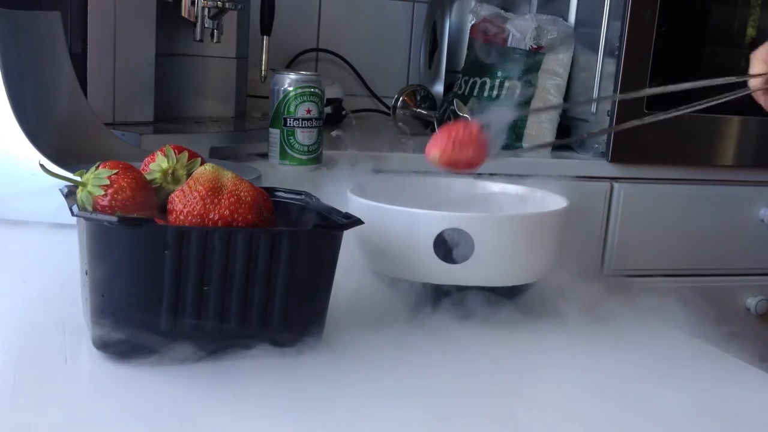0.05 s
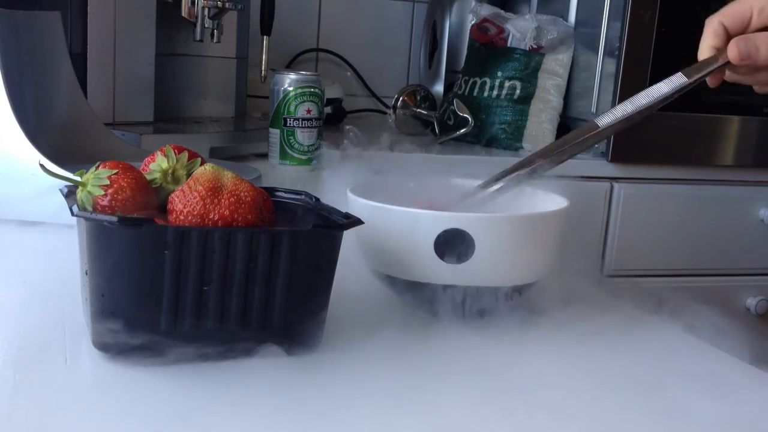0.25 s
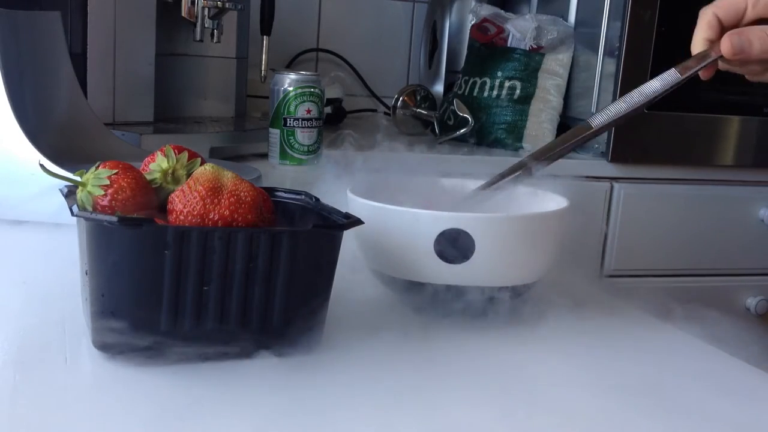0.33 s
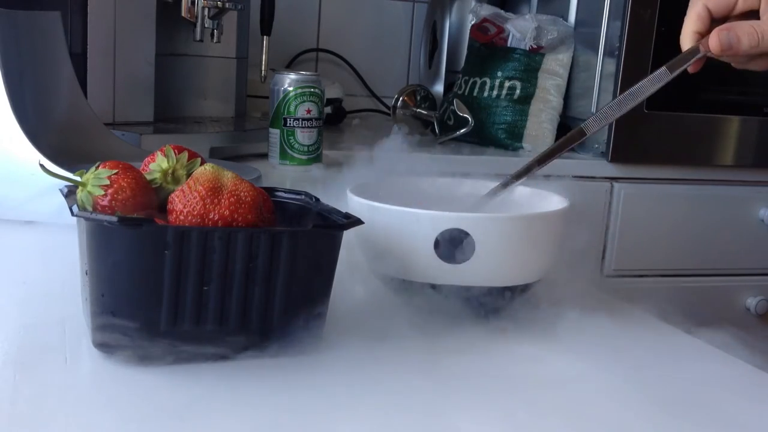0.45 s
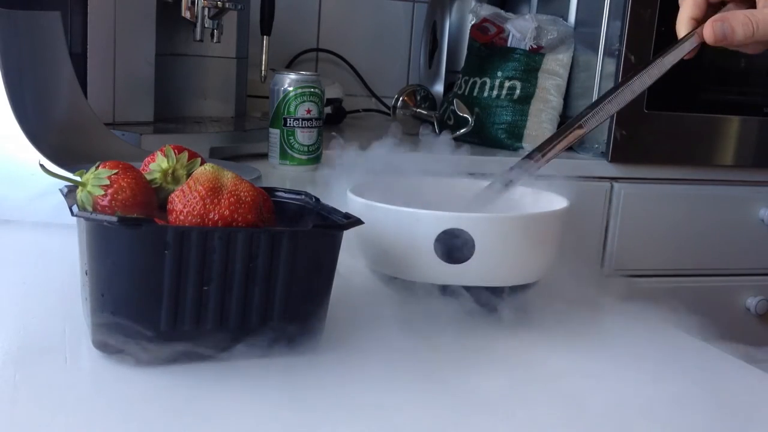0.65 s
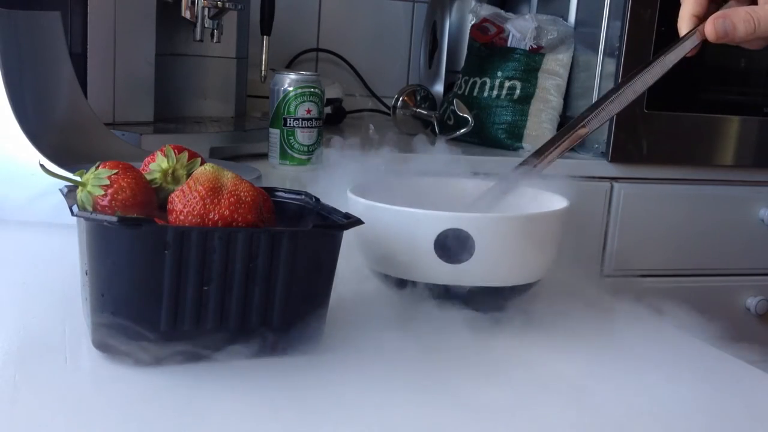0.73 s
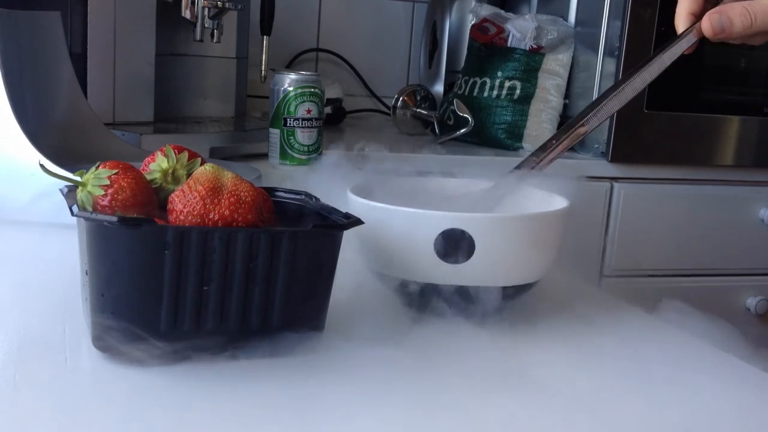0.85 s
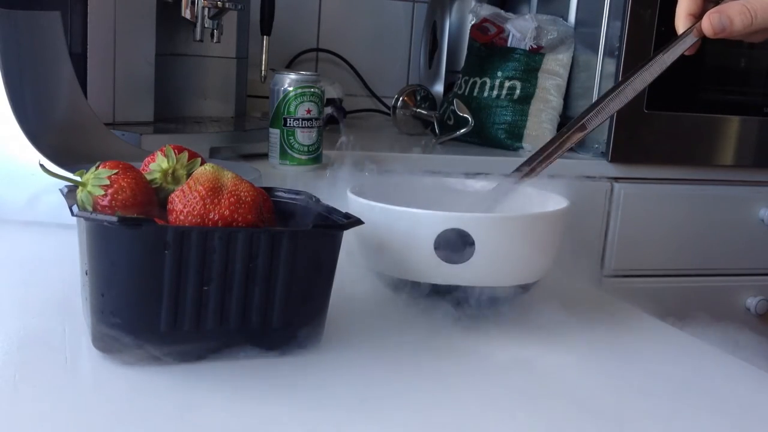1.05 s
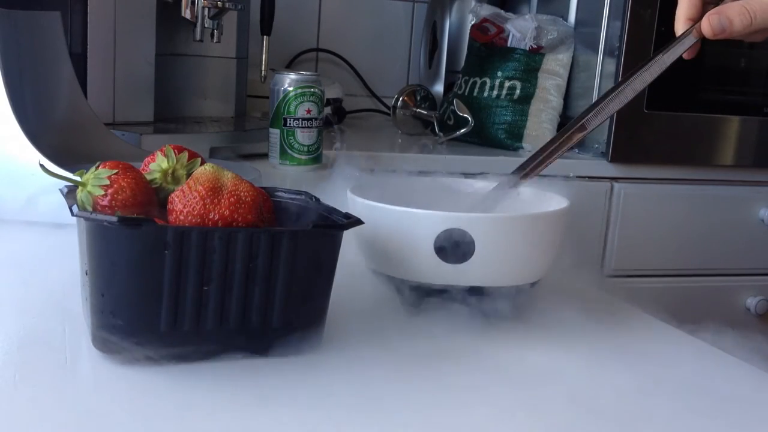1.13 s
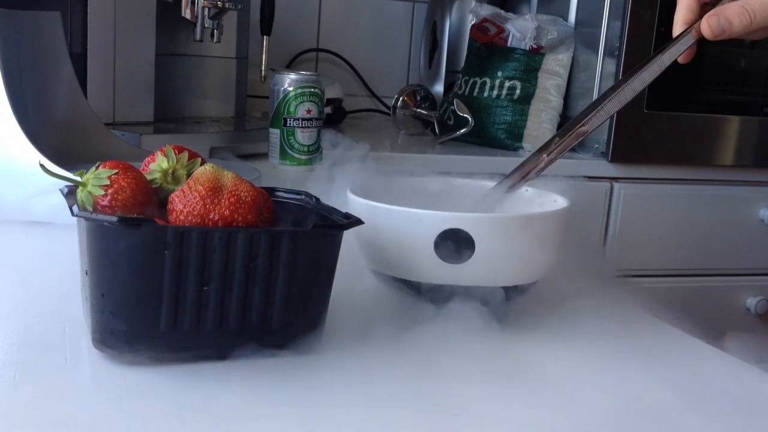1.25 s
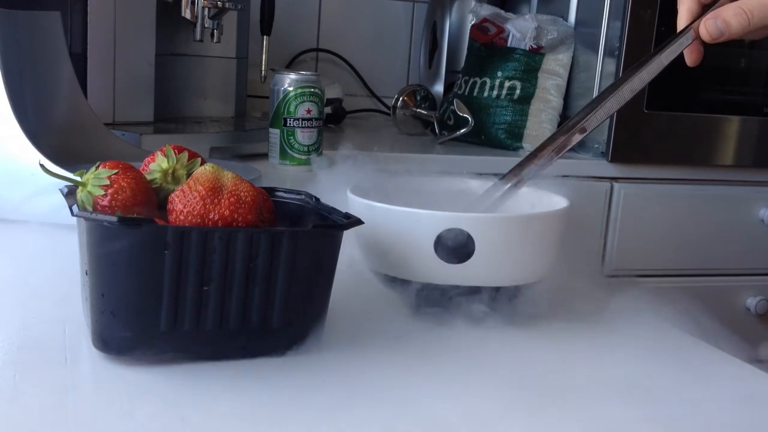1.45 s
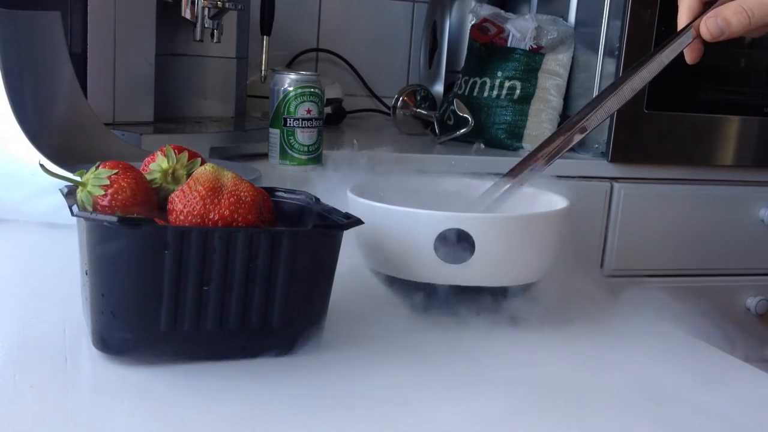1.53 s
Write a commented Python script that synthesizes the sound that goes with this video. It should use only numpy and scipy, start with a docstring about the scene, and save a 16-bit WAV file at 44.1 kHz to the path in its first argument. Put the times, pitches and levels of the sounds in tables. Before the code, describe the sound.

Metal tongs clink on a bowl as a strawberry thuds in, then a faint fizz.

```python
"""Strawberry into a freezing bowl

Steel tongs lower a strawberry into very cold liquid in a bowl on a kitchen counter. They clink on the
bowl three times, ever more lightly, both arms ringing; the berry lands with a thud and bumps once more.
Vapour boils off in a soft fizz with a few larger bubbles, and the fruit ticks as it freezes.
Hits and bubbles echo in the kitchen, over a bed of room air and appliance hum."""
import sys
import numpy as np
from scipy import signal
from scipy.fft import rfft, irfft
from scipy.io import wavfile

SR = 44100
rng = np.random.default_rng(int(sys.argv[2]) if len(sys.argv) > 2 else 0)


def unload_audio(sound):
    """Save the sound as a 16-bit wav file, at the path given as the first command line argument."""
    columns = np.transpose(np.atleast_2d(sound))
    # keep every value between -1 and 1, then stretch to whole-number steps
    steps = np.round(np.clip(columns, -1, 1) * 32767)
    wavfile.write(sys.argv[1], SR, steps.astype(np.int16))


N = 70560
TIME = np.arange(N) / SR
SHARP_RISE_S, SOFT_RISE_S = 0.00022, 0.001

# Tone colour of the room air: f/Hz, relative level/dB
AIR_SPECTRUM = [(30, -23), (60, -29), (100, -8.5), (160, 0), (240, 0), (350, -3.5), (500, -9.5),
                (750, -7.5), (1400, -14), (2500, -16), (7500, -17.5), (15000, -21)]
# Partials of the appliance hum: f/Hz, relative level/dB
HUM_PARTIALS = [(193.8, -65.5), (242.2, -62), (296.1, -67.5), (344.5, -63), (436.0, -69.5), (689.1, -71),
                (1217, -74)]
# Tone colour of the boiling vapour: f/Hz, relative level/dB
VAPOUR_SPECTRUM = [(400, -15), (800, 6), (1400, 2), (2800, -3.5), (5000, -3.5), (7800, 2), (10000, -8.5),
                   (15000, -6)]
# Swell and ebb of the boil: t/s, level/dB
BOIL_CURVE = [(0, -80), (.25, -56), (.55, -59.5), (.85, -61), (1.1, -58.5), (1.25, -62.5), (1.38, -58),
              (1.6, -60.5)]
# Dry ticks of the freezing fruit: t/s, level/dB, centre f/Hz, t60/s
FREEZE_TICKS = [(0.0535, -34, 9900, 0.015), (0.6720, -45, 5500, 0.014), (0.8753, -42.5, 6000, .02),
                (1.1330, -50, 6000, .03), (1.3050, -48, 12000, .015), (1.543, -50, 7500, .015)]
# Tongs hit the bowl: t/s, first arm level/dB, second arm level/dB, ring tilt/(dB per octave),
# crack level/dB, knock level/dB
TONG_HITS = [(0.2366, -13, -10.5, 0, -17.5, -25), (0.3780, -19.5, -24, -3.5, -31, -36.5),
             (0.4848, -35, -46, 0.5, -37.5, -47.5)]
# Tone colour of the steel's contact crack: f/Hz, relative level/dB
CRACK_SPECTRUM = [(1500, -6), (2500, -12.5), (3500, 8), (5000, -8), (6200, -7), (9000, 5), (10500, -4),
                  (13000, -2.5), (15000, -6)]
# Modes of each arm of the tongs: f/Hz, relative flash level/dB, flash t60/s, relative tail level/dB
FIRST_ARM_MODES = [(3409, -10, 0.088, -24.5), (4270, -19, .04, -31), (5903, -5.5, 0.032, -24),
                   (5977, -1, 0.047, -37.5), (8910, -9.5, 0.045, -31), (9100, -14, 0.036, -29),
                   (13170, -20.5, .04, -36)]
SECOND_ARM_MODES = [(3351, -9, 0.042, -29), (4705, -15.5, 0.042, -29.5), (6150, 5, 0.017, -31),
                    (6684, -14.5, 0.052, -25.5), (8070, -16.5, 0.037, -26), (11810, -19.5, 0.047, -32),
                    (12440, -25, 0.061, -31)]
# Tone colour of the bowl knocking on the counter: f/Hz, relative level/dB
KNOCK_SPECTRUM = [(40, -35), (90, -12), (150, -20), (210, 0), (280, 0), (420, 3.5), (800, -13), (1400, -3),
                  (2200, -6), (4000, -58)]
# Low modes of bowl and counter: f/Hz, relative level/dB, t60/s
BOWL_COUNTER_MODES = [(151.2, -11.5, 0.27), (211, -1, 0.18), (312, -6, 0.06), (420, -7, 0.13),
                      (589.3, -9.5, 0.14), (649, -8.5, .1), (695.7, -14.5, 0.3), (961, -16.5, 0.2),
                      (1302, -9, 0.13), (1349, -12.5, 0.22), (1670, -10, 0.068), (1782, -18, 0.27)]
# The berry hits the bowl: t/s, slap level/dB, thud level/dB, low-pass f/Hz, thud t60/s, bowl level/dB
BERRY_HITS = [(0.2574, -5, -22.5, 2460, 0.057, -32.5), (0.2602, -10, -19.5, 1125, 0.1, -25.5),
              (0.2683, -21.5, -24.5, 1420, .07, -43), (0.5567, -40, -35.5, 651, 0.078, -37.5)]
# Tone colour of the berry's thud: f/Hz, relative level/dB
THUD_SPECTRUM = [(40, -42), (90, -33), (150, -3), (210, -18), (300, 3.5), (420, -6.5), (650, 1.5),
                 (1300, -7), (2500, -2), (6000, -44)]
# Tone colour of the kitchen reverb: f/Hz, level/dB
REVERB_SPECTRUM = [(100, -4.5), (300, -15.5), (1000, -9), (2500, -5.5), (6000, -12), (14000, -6.5)]
# Decay of the kitchen reverb: f/Hz, t60/s
REVERB_DECAY = [(100, 0.13), (500, 0.57), (2000, 0.43), (6000, 0.48), (14000, 0.3)]


def from_db(db):
    """Decibels to gain."""
    return 10 ** (np.asarray(db) / 20)


def unit_rms(x):
    """Scale to an rms of 1."""
    return x / np.sqrt(np.mean(x ** 2) + 1e-20)


def at_hz(points, hz):
    """Read a table on a log-frequency axis."""
    table_hz, values = np.transpose(points)
    return np.interp(np.log(np.maximum(hz, 1)), np.log(table_hz), values)


def colour(x, spectrum):
    """EQ a steady signal with a spectrum; rms 1."""
    hz = np.arange(N // 2 + 1) * SR / N
    return unit_rms(irfft(rfft(x) * from_db(at_hz(spectrum, hz)), N))


def noise(spectrum):
    """Coloured noise; rms 1."""
    return colour(rng.standard_normal(N), spectrum)


def drift(rate_hz):
    """Random wander, mostly slower than the rate; rms 1."""
    hz = np.arange(N // 2 + 1) * SR / N
    return unit_rms(irfft(rfft(rng.standard_normal(N)) / (1 + (hz / rate_hz) ** 2), N))


def strike(start, rise, t60):
    """Envelope of a hit: fast attack, exponential decay; times in seconds."""
    age = np.maximum(TIME - start, 0)
    return (1 - np.exp(-age / rise)) * np.exp(-np.minimum(np.log(1000) * age / t60, 40))


def ping(start, hz, rise, t60):
    """One struck mode: a decaying sine."""
    return np.sin(2 * np.pi * hz * (TIME - start)) * strike(start, rise, t60)


def room_tone():
    """A bed of soft air and appliance hum, each partial wavering on its own."""
    hum = np.zeros(N)
    for hz, db in HUM_PARTIALS:
        gain = from_db(db + 2 + 2.5 * drift(rate_hz=5))
        hum += gain * np.sin(2 * np.pi * (hz * TIME + rng.random()))
    return from_db(-55) * noise(AIR_SPECTRUM) + hum


def vapour(pops_per_s=540, fizz_db=-4):
    """Vapour boils off: a gently surging hiss with a fine fizz of bursting bubbles."""
    pops = (rng.random(N) < pops_per_s / SR) * rng.choice([-1, 1], N)
    accents = from_db(4 * np.minimum(rng.exponential(1, N), 4))
    fizz = from_db(fizz_db) * colour(pops * accents, VAPOUR_SPECTRUM)
    level_db = np.interp(TIME, *np.transpose(BOIL_CURVE)) + drift(rate_hz=27)
    return from_db(level_db) * (noise(VAPOUR_SPECTRUM) + fizz)


def bubbles(count=30, low_hz=587, high_hz=2020, above_boil_db=4):
    """Larger bubbles ring briefly at random times and pitches, riding the level of the boil."""
    out = np.zeros(N)
    for when, pitch, _ in rng.random((count, 3)):
        start = when * N / SR
        hz = low_hz * (high_hz / low_hz) ** pitch
        db = np.interp(start, *np.transpose(BOIL_CURVE)) + above_boil_db
        out += from_db(db) * ping(start, hz, SOFT_RISE_S, t60=0.039)
    return out


def freezing_ticks(skirt_db_per_octave=-4.5):
    """The fruit freezes with tiny, bright snaps of noise."""
    out = np.zeros(N)
    for start, db, hz, t60 in FREEZE_TICKS:
        spectrum = [(hz * 2.0 ** octave, skirt_db_per_octave * abs(octave)) for octave in range(-5, 2)]
        out += from_db(db) * noise(spectrum) * strike(start, SHARP_RISE_S, t60)
    return out


def tongs(slide_start_s=0.222, slide_s=0.015):
    """A short slide, then the clinks: each layers a crack, two ringing arms and a knock of the bowl."""
    sliding = (TIME > slide_start_s) & (TIME < slide_start_s + slide_s)
    out = from_db(-52) * noise(CRACK_SPECTRUM) * sliding
    for start, first_db, second_db, tilt_db, crack_db, knock_db in TONG_HITS:
        out += arm_ring(FIRST_ARM_MODES, start, first_db, tilt_db)
        out += arm_ring(SECOND_ARM_MODES, start, second_db, tilt_db)
        crack = noise(CRACK_SPECTRUM) * strike(start, SHARP_RISE_S, t60=0.041)
        knock = noise(KNOCK_SPECTRUM) * strike(start, SOFT_RISE_S, t60=0.098) + bowl_ring(start)
        out += from_db(crack_db) * crack + from_db(knock_db) * knock
    return out


def arm_ring(modes, start, level_db, tilt_db, flutter_hz=55):
    """A steel arm's modes flash, are damped by the hand and leave a faint, fluttering tail."""
    out = np.zeros(N)
    for hz, flash_db, flash_t60, tail_db in modes:
        pitch_ratio = hz / FIRST_ARM_MODES[0][0]
        rise = 3.8 / hz  # an attack of a few cycles
        flash = from_db(flash_db) * ping(start, hz, rise, flash_t60)
        phase = 2 * np.pi * hz * TIME
        flutter = (drift(flutter_hz) * np.sin(phase) + drift(flutter_hz) * np.cos(phase)) / np.sqrt(2)
        tail_t60 = 0.44 / pitch_ratio ** 0.53  # higher modes die sooner
        tail = from_db(tail_db) * flutter * strike(start, rise, tail_t60)
        scatter_db = -0.5 * rng.normal()
        out += from_db(level_db + tilt_db * np.log2(pitch_ratio) + scatter_db) * (flash + tail)
    return out


def bowl_ring(start):
    """The body of a hit: low modes of bowl and counter ring in alternating polarity."""
    return sum((-1) ** k * from_db(db) * ping(start, hz, SOFT_RISE_S, t60)
               for k, (hz, db, t60) in enumerate(BOWL_COUNTER_MODES))


def berry():
    """The fruit lands and bumps: a slap, a thud and the bowl's ring, dullest on the soft last bump."""
    out = np.zeros(N)
    for start, slap_db, thud_db, cutoff_hz, t60, bowl_db in BERRY_HITS:
        slap = from_db(slap_db) * ping(start, hz=1190, rise=SHARP_RISE_S, t60=0.0055)  # about one cycle
        thud = from_db(thud_db) * noise(THUD_SPECTRUM) * strike(start, rise=0.00036, t60=t60)
        ring = from_db(bowl_db) * bowl_ring(start)
        muffle = signal.butter(4, cutoff_hz, fs=SR, output="sos")
        out += signal.sosfilt(muffle, slap + thud + ring)
    return out


def kitchen_reverb(x, predelay_s=0.0059):
    """Diffuse reflections off the kitchen, each band dying at its own rate; wet signal only."""
    response = np.zeros(N)
    edges_hz = np.geomspace(70, 18000, 13)
    for low, high in zip(edges_hz, edges_hz[1:]):
        centre_hz = np.sqrt(low * high)
        decay = strike(predelay_s, SOFT_RISE_S, at_hz(REVERB_DECAY, centre_hz))
        bandpass = signal.butter(2, [low, high], "band", fs=SR, output="sos")
        band = signal.sosfilt(bandpass, rng.standard_normal(N))
        response += from_db(at_hz(REVERB_SPECTRUM, centre_hz)) * band * decay / np.sqrt(np.sum(decay ** 2))
    return signal.fftconvolve(x, response)[:N]


def scene():
    """Mono mix: hits and bubbles feed the reverb, while vapour and room tone stay dry."""
    hits = tongs() + berry() + freezing_ticks() + bubbles()
    return (hits + kitchen_reverb(hits) + vapour() + room_tone())[None]


def record(dry):
    """The microphone thins the bass; a steep high cut takes off the very top."""
    low_cut = signal.butter(2, 93, "high", fs=SR, output="sos")
    high_cut = signal.ellip(10, 0.2, 75, 15250, fs=SR, output="sos")
    return signal.sosfilt(high_cut, signal.sosfilt(low_cut, dry))


dry = scene()
out = record(dry)
unload_audio(out)
```